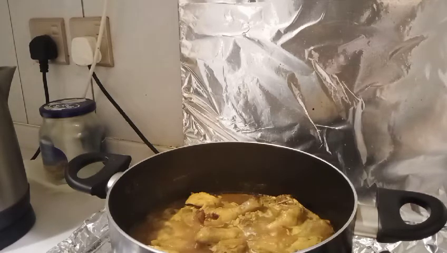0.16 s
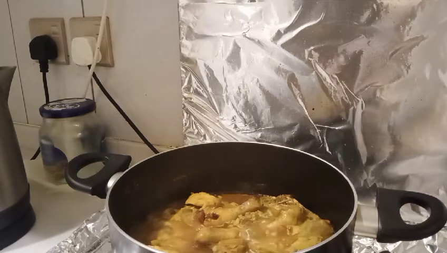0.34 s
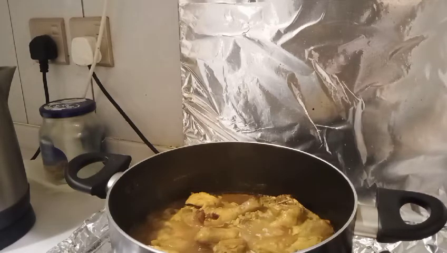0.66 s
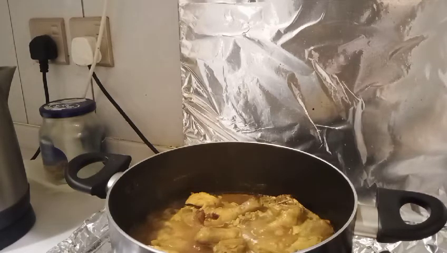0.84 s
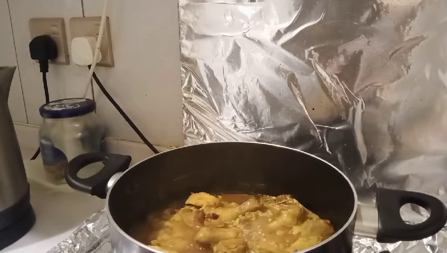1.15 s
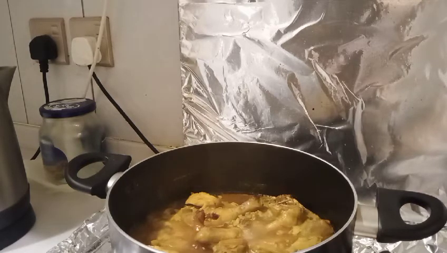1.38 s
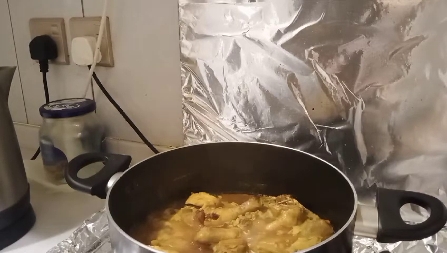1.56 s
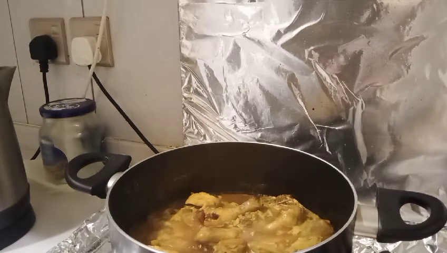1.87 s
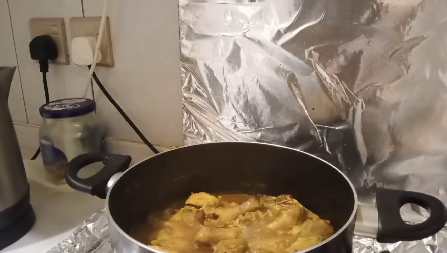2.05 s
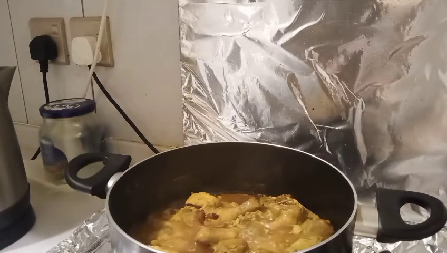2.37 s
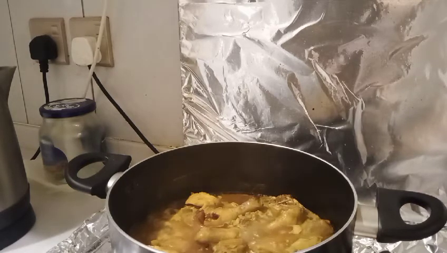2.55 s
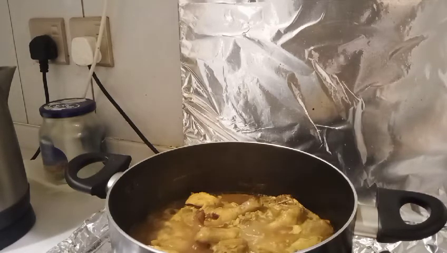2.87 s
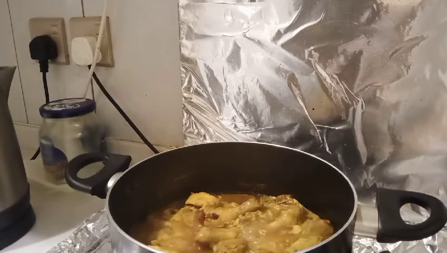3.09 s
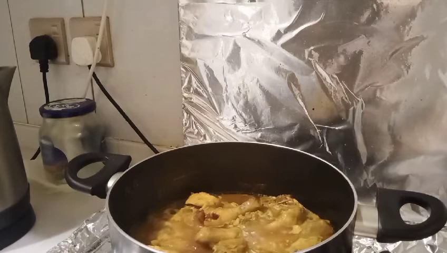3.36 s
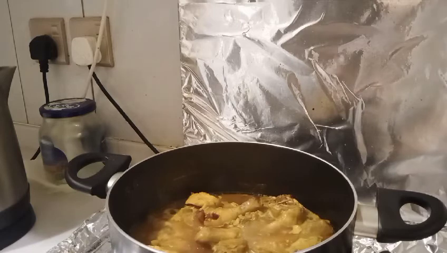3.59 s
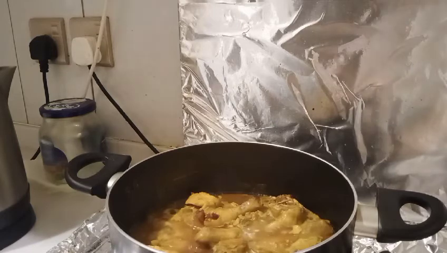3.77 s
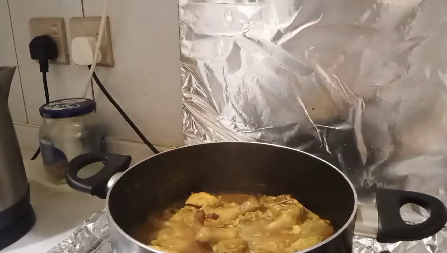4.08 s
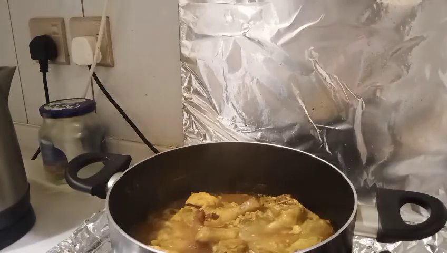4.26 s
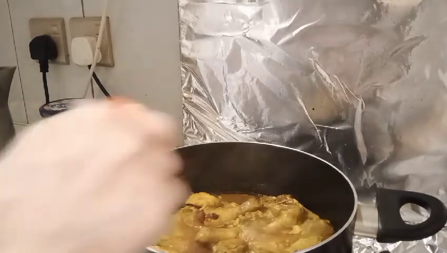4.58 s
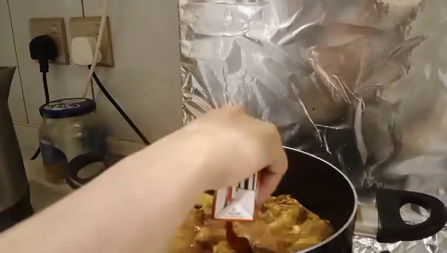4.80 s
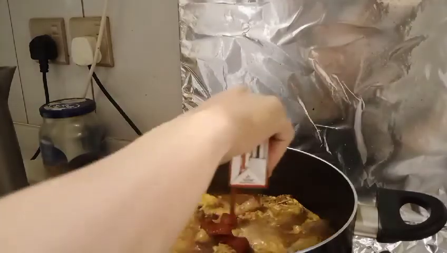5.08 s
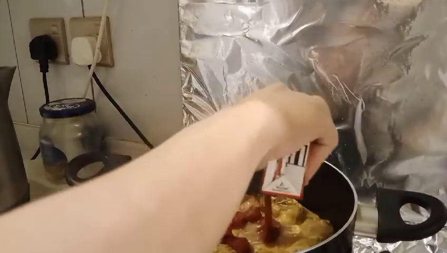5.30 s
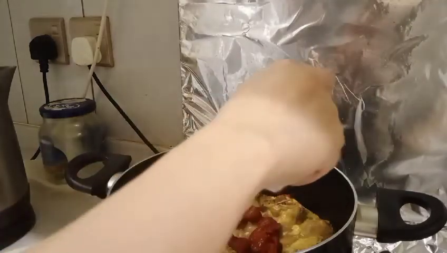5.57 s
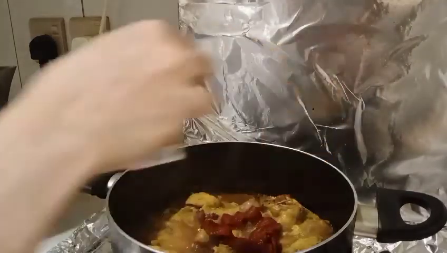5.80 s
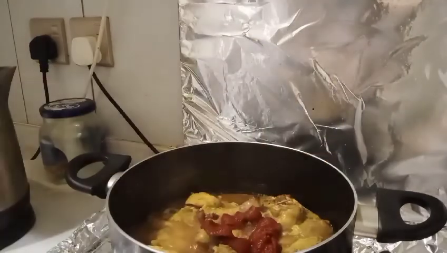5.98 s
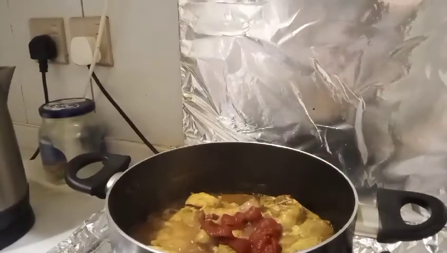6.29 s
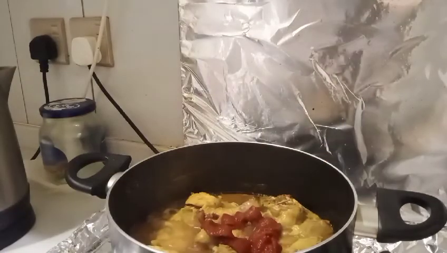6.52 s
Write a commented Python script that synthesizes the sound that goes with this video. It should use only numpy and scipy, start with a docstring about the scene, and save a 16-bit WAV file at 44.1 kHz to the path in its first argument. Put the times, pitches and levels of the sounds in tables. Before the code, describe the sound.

A close, small kitchen: stew blips and sputters above a quiet gas flame, calms, then a carton lands sharply on the worktop.

```python
"""A thick stew simmers in a pan in a small kitchen: tiny bubbles ping over the steady rush of the burner.
From the start to about 4.6 s, some three big bubbles a second heave the stew, puff steam and gurgle.
Until about 4.1 s blisters also pop: filtered noise with a ringing cavity. The stew slumps at 2.7 and 4.2 s.
Around 5 s a carton's spout splutters, and the stew slumps under the falling paste.
At 6.3 s the carton lands with a knock of decaying tones and a crack of noise, then bumps softly."""
import sys
import numpy as np
from scipy import signal
from scipy.fft import rfft, irfft, next_fast_len
from scipy.io import wavfile
from scipy.ndimage import uniform_filter1d, map_coordinates

SR = 44100
rng = np.random.default_rng(int(sys.argv[2]) if len(sys.argv) > 2 else 0)


def unload_wav(signal):
    """Save mono or channel-first audio to the path in sys.argv[1] as 16-bit WAV at rate SR, clipped to [-1, 1]."""
    wavfile.write(
        sys.argv[1],
        SR,
        np.round(np.clip(np.atleast_2d(signal).T, -1, 1) * 32767).astype(np.int16),
    )


N = 293265

# Big bubbles letting out steam; gurgles() and heaves() use them too. Levels are before pan and kitchen:
# (time of the steam's peak [s], steam level [dB], swell [s], treble tilt [dB per octave],
#  heave level [dB], gurgle pitch [Hz], gurgle level [dB])
BIG_BUBBLES = [(.13, -52.5, 0.073, 1, -65.5, 1660, -77), (0.519, -72, .06, 22, -80, 1230, -78),
               (.757, -49, 0.041, 0.5, -60.5, 1440, -75), (1.184, -56.5, .045, 1.5, -85, 1450, -88),
               (1.605, -45.5, 0.035, 0, -68, 1540, -61.5), (2.019, -55, 0.062, 5.5, -68, 1290, -85),
               (2.47, -47.5, 0.071, 5, -86, 1480, -54.5), (2.799, -66.5, 0.077, 3.5, -75, 3830, -71.5),
               (3.201, -52, .07, 8.5, -69.5, 1490, -87), (3.615, -51.5, .048, 2, -62.5, 1390, -74),
               (3.796, -63.5, 0.034, 4, -80, 1730, -72), (4.1, -58, 0.034, 10, -76, 1110, -51.5),
               (4.375, -67, 0.052, 7, -72, 2100, -81), (4.585, -56.5, 0.058, 4, -73, 1300, -60.5)]
# The carton's spout spluttering as it is squeezed: (time of the peak [s], level before pan and kitchen [dB])
SPOUT_SPLUTTERS = [(4.82, -64.5), (5.02, -70), (5.341, -69)]
FADE_S, FADE_SHARE = 0.038, 0.32  # a puff fades over this time plus a share of its swell
# The vent reopens once: delay, level against the puff, half length
AFTER_S, AFTER_DB, AFTER_LENGTH_S = 0.1, -14, 0.028
SPLUTTER_S, SPLUTTER_TILT_DB = 0.015, 22  # half length, treble tilt per octave


def puffs():
    """Steam sputters through wet vents, swelling and fading with each bubble; the carton's spout does too."""
    out = np.zeros(N)
    t = np.arange(-SR // 4, SR // 4) / SR
    for s, db, rise, tilt_db, *_ in BIG_BUBBLES:
        fall = FADE_S + FADE_SHARE * rise
        puff = swell(t, rise, fall) * hiss(len(t), tilt_db)
        add(out, s + t[0], amp(db) * puff)
        after_puff = swell(t, AFTER_LENGTH_S, AFTER_LENGTH_S) * hiss(len(t), tilt_db)
        add(out, s + AFTER_S + t[0], amp(db + AFTER_DB) * after_puff)
    for s, db in SPOUT_SPLUTTERS:
        splutter = swell(t, SPLUTTER_S, SPLUTTER_S) * hiss(len(t), SPLUTTER_TILT_DB)
        add(out, s + t[0], amp(db) * splutter)
    sputter = churn(out, patchy_db=3)
    return kitchen(pan(sputter, level_db=-0.5), wet_db=-13.5)


# The stew slumping after the widest bursts and under the falling paste; heaves() uses them too:
# (time of the peak [s], rumble pitch [Hz], rumble level [dB], rumble half length [s],
#  gurgle pitch [Hz], gurgle level [dB])
STEW_SLUMPS = [(2.675, 128, -60.5, .055, 3230, -52.5), (4.16, 103.5, -53, 0.075, 440, -55),
               (5.021, 122, -65, 0.046, 320, -82)]
GURGLE_LAG_S, GURGLE_S = 0.02, 0.027  # lag on the steam, half length of the fall
AFTER_GURGLE_DB, AFTER_PITCH = -20, 1.103  # level against the puff; the shrunken pocket rings higher


def gurgles():
    """After each puff, as its vent reopens, and in each slump, steam blown across a pocket sounds hollow."""
    out = np.zeros(N)
    t = np.arange(-SR // 4, SR // 4) / SR
    pockets = [(s, hz, db, GURGLE_S) for s, *_, hz, db in STEW_SLUMPS]
    for s, steam_db, *_, hz, db in BIG_BUBBLES:
        pockets.append((s + GURGLE_LAG_S, hz, db, GURGLE_S))
        pockets.append((s + AFTER_S, AFTER_PITCH * hz, steam_db + AFTER_GURGLE_DB, AFTER_LENGTH_S))
    for s, pitch_hz, db, length in pockets:
        note = turbulence(len(t), lambda hz: resonance(hz, pitch_hz, 0.22 * pitch_hz) ** 2)
        add(out, s + t[0], amp(db) * swell(t, 1.5 * length, length) * note)
    return out


# The lift: pitch, lead on the steam (share of the swell), half length
HEAVE_HZ, HEAVE_LEAD, HEAVE_S = 125, 0.6, 0.04


def heaves():
    """Each big bubble lifts the stew just before its steam peaks; lifts and slumps make a dull rumble."""
    out = np.zeros(N)
    t = np.arange(-SR // 4, SR // 4) / SR
    lifts = [(s - HEAVE_LEAD * rise, HEAVE_HZ, db, HEAVE_S) for s, _, rise, _, db, *_ in BIG_BUBBLES]
    for s, pitch_hz, db, length, *_ in lifts + STEW_SLUMPS:
        rumble = turbulence(len(t), lambda hz: resonance(hz, pitch_hz, 0.8 * pitch_hz) ** 2)
        add(out, s + t[0], amp(db) * swell(t, length, length) * rumble)
    return out


# Blisters bursting; levels are before the trim, pan and kitchen, the cavity's is against the spray:
# (time [s], level [dB], cavity pitch [Hz], cavity level [dB],
#  spray low edge [Hz], spray high edge [Hz], time constant of the opening [s])
BLISTERS = [(0.043, -60, 3240, 2, 915, 4000, 0.031), (0.0817, -46, 890, -1.5, 130, 1340, .0012),
            (.238, -54, 890, -1, 570, 1150, .008), (1.082, -34, 310, -20.5, 760, 4950, 0.0075),
            (1.553, -52, 520, -11, 1120, 4500, .0085), (1.939, -53.5, 750, 2, 676, 1700, .012),
            (1.968, -54.5, 843, 0.5, 690, 1370, 0.006), (2.088, -59, 1310, -1, 1000, 2970, 0.0045),
            (2.495, -38, 3700, 0, 3000, 9000, .002), (2.4994, -19.5, 3735, -6, 2200, 11000, .0008),
            (2.578, -30.3, 695, -7.5, 1010, 3400, .0025), (3.087, -42, 310, -15, 1370, 5130, 0.018),
            (3.563, -56, 700, -12, 1000, 4480, 0.011), (4.01, -45.5, 4140, -3, 3000, 4750, .011),
            (4.0769, -30.5, 2183, -1.5, 710, 4000, .001)]
# The mouth's note against the cavity's; smaller cavities sound it less
MOUTH_HZ, MOUTH_DB, MOUTH_DB_PER_OCTAVE = 1220, -5.5, -6.5
# Spray reaching up to this high edge takes longest to fall 60 dB;
# fine mist and thick plops die sooner, by this power
POP_T60_S, POP_REF_HZ, POP_DAMPING = 0.28, 3900, 0.45
# The first jet lasts this long, ends about this fast, and the level drops by this much
SPRAY_S, SPRAY_END_S, SPRAY_DROP_DB = 0.037, 0.003, 3


def pops():
    """A blister tears open: a spit of spray rattles round the pan while its cavity and mouth ring."""
    out = np.zeros(N)
    t = np.arange(SR // 2) / SR
    jet = amp(-SPRAY_DROP_DB * (1 + np.tanh((t - SPRAY_S) / SPRAY_END_S)) / 2)
    for s, db, cavity_hz, cavity_db, low_hz, high_hz, opening in BLISTERS:
        def band(hz):
            low_edge = 0.016 + 1 / np.sqrt(1 + (low_hz / (hz + 1)) ** 8)
            return low_edge / np.sqrt(1 + (hz / high_hz) ** 5)

        spit = turbulence(len(t), band, grain_db=2.0)
        octaves_above = np.log2(max(cavity_hz / MOUTH_HZ, 1))
        mouth_db = cavity_db + MOUTH_DB + MOUTH_DB_PER_OCTAVE * octaves_above
        for note_hz, note_db in ((cavity_hz, cavity_db), (MOUTH_HZ, mouth_db)):
            width_hz = 160 + 0.021 * note_hz
            note = turbulence(len(t), lambda hz: resonance(hz, note_hz, width_hz) ** 2)
            spit = spit + amp(note_db) * note
        t60 = POP_T60_S * min(POP_REF_HZ / high_hz, high_hz / POP_REF_HZ) ** POP_DAMPING
        burst = (1 - np.exp(-t / opening)) * amp(-60 * t / t60)
        envelope = jet * spurts(len(t)) * burst / burst.max()
        add(out, s, kitchen(amp(db - 1.5) * envelope * spit, wet_db=-11.0))
    return pan(out, level_db=-2.0)


# The carton landing and settling, before the trim and kitchen:
# (time [s], level [dB], crack level against it [dB], softness of the contact [s])
CARTON_KNOCKS = [(6.3397, -11.5, -12.5, 0.0013), (6.585, -45, -33, 0.0055)]
# Ringing tones of carton and worktop: (pitch [Hz], level [dB], time to fall 60 dB [s])
WORKTOP_TONES = [(129.3, -19.5, 0.21), (145, -18.5, 0.1), (256, -11, 0.04), (283, -22.5, 0.07),
                 (420, -10, 0.053), (561, -12.5, 0.1), (642, -18.5, 0.12), (808, 1, 0.016),
                 (881, -4, 0.043), (1089, 10, 0.012), (1173, -4, 0.032), (1420, -1.5, 0.019)]
# Colour of the crack: (frequency [Hz], relative level [dB])
CRACK_COLOUR = [(100, 21), (1400, -22), (2000, 2), (2700, 4.5), (4300, 5), (6000, -3.5), (16000, -12)]


def carton():
    """The carton hits the worktop: a brief crack and a hollow ringing knock, then a soft settling bump."""
    out = np.zeros(N)
    t = np.arange(SR // 2) / SR
    ring = sum(amp(level - 60 * t / t60) * np.sin(2 * np.pi * hz * t) for hz, level, t60 in WORKTOP_TONES)
    for s, db, crack_db, softness in CARTON_KNOCKS:
        crack_noise = turbulence(len(t), lambda hz: amp(along(CRACK_COLOUR, hz)))
        crack = amp(crack_db - 60 * t / 0.03) * crack_noise
        contact = amp(db) * (1 - np.exp(-(t / softness) ** 2))
        add(out, s, kitchen(0.73 * contact * ring, wet_db=-7.0) + kitchen(contact * crack, wet_db=-8.5))
    # the knock keeps almost no deep bass below about 90 Hz
    return signal.sosfilt(signal.butter(4, 92, "highpass", fs=SR, output="sos"), out)


def simmer(count=70, level_db=-78, pitch_hz=2300, cycles=40):
    """Tiny bubbles burst all the time, each a short, slightly rising ping."""
    out = np.zeros(N)
    t = np.arange(SR // 10) / SR
    times = rng.uniform(0, N / SR, count)
    for when, (pitch, size) in zip(times, rng.standard_normal((count, 2))):
        hz = min(pitch_hz * np.exp(0.6 * pitch), SR / 4)
        age = t * hz / cycles  # at age 1 the ping is 30 dB down
        tone = np.sin(2 * np.pi * hz * t * (1 + 0.027 * np.minimum(age, 1)))
        ping = tone * amp(-30 * age) * (1 - np.exp(-20 * age))
        add(out, when, amp(level_db + 3.7 * min(size, 1)) * ping)
    return kitchen(out, wet_db=6)


# Colour of the burner's rush: (frequency [Hz], relative level [dB])
FLAME_COLOUR = [(25, -21), (60, -13), (78, -11.5), (120, 2.5), (160, -6), (300, -5), (600, -13),
                (1250, -12.5), (1600, -18), (2300, -20.5), (2800, -22.5), (6300, -30.5), (10000, -27.5),
                (15500, -32.5)]
# Narrow resonances singing in the hiss:
# (pitch [Hz], width before widening [Hz], level [dB], depth of the flaring [dB])
FLAME_WHISTLES = [(2042, 270, -77, 3), (2383, 93, -77.5, 3), (3220, 55, -82.5, 3), (4250, 76, -91.5, 6),
                  (5280, 90, -83.5, 4), (5530, 110, -93.5, 4.5), (7240, 74, -91.5, 9.5),
                  (7770, 200, -78.5, 1)]


def burner():
    """The flame rumbles and hisses as coloured noise; thin whistles flare and fade in it."""
    rush_gain = amp(-68.0 + 0.53 * wobble(4.3, N))
    rush = rush_gain * turbulence(N, lambda hz: amp(along(FLAME_COLOUR, hz)))
    for centre_hz, width_hz, db, flare_db in FLAME_WHISTLES:
        whistle = turbulence(N, lambda hz: resonance(hz, centre_hz, 1.19 * width_hz) ** 2)
        rush = rush + amp(db) * unit(amp(flare_db * wobble(21, N)) * whistle)
    return rush


# Colour of escaping steam: (frequency [Hz], relative level [dB])
STEAM_COLOUR = [(100, -15), (500, -26.5), (1000, -31), (2100, -7), (2900, 3.5), (4000, 4), (5200, 0),
                (7000, 1), (16000, -7.5)]


def hiss(n, tilt_db):
    """Gas forced through a wet opening; a narrower one tilts it towards the treble."""
    def colour(hz):
        octaves = np.clip(np.log2((hz + 1) / 4500), -1, 1)
        return amp(along(STEAM_COLOUR, hz) + tilt_db * octaves)

    return spurts(n) * turbulence(n, colour, grain_db=2.0)


SPUTTER_DB, SPUTTER_RATE = 1.5, 57.1  # depth, random curve points a second


def spurts(n):
    """The uneven gain of spray and steam flowing through thick sauce."""
    return amp(SPUTTER_DB * wobble(SPUTTER_RATE, n))


def churn(x, patchy_db):
    """The wet openings keep changing shape, so patches of the spectrum come and go."""
    z = signal.stft(x, nperseg=1024)[2]
    field = uniform_filter1d(rng.standard_normal(z.shape), size=5, axis=0)
    field = uniform_filter1d(field, size=4, axis=1)
    gain = amp(patchy_db * unit(field))
    return signal.istft(z * unit(gain), nperseg=1024)[1][:len(x)]


# Resonances of the pan's air and metal: (pitch [Hz], width [Hz], level against the direct sound [dB])
PAN_RESONANCES = [(817, 44, -8), (1310, 110, -5.5), (1723, 97, -4.5), (2000, 27, -8), (2615, 40, -4),
                  (3200, 41, -1.5), (3650, 18, 2.5), (3910, 54, 3), (4427, 88, 0), (5550, 160, -1.5),
                  (6660, 110, -4), (6720, 18.6, 3.5), (6910, 18, 7), (7390, 11, 11)]


def pan(x, level_db):
    """The direct sound plus the ringing of the pan around it."""
    def ring(hz):
        return sum(amp(db) * resonance(hz, centre, width) for centre, width, db in PAN_RESONANCES)

    return filtered(x, lambda hz: amp(level_db) * (1 + ring(hz)))


# Echo of the close walls: (frequency [Hz], time to fall 60 dB [s])
KITCHEN_DECAY = [(100, 0.46), (300, 0.27), (1000, 0.23), (4000, 0.24), (8000, 0.15), (15000, 0.12)]


def kitchen(x, wet_db):
    """x with the answer of the close walls; each frequency dies at its own speed."""
    hz, t, z = signal.stft(rng.standard_normal(SR // 2), SR, nperseg=256)
    decay = amp(-60 * t / along(KITCHEN_DECAY, hz)[:, None])
    tail = signal.istft(z * decay, SR, nperseg=256)[1]
    tail = np.pad(tail / np.linalg.norm(tail), (SR // 250, 0))  # the walls answer 4 ms late
    return x + amp(wet_db) * signal.fftconvolve(x, tail)[:len(x)]


def amp(db):
    """Decibels as a plain gain."""
    return 10 ** (np.asarray(db) / 20)


def unit(x):
    """x at rms 1."""
    return x / np.sqrt(np.mean(x ** 2) + 1e-20)


def along(points, hz):
    """Read (frequency [Hz], value) points at any frequency, on a log axis."""
    f, v = np.transpose(points)
    return np.interp(np.log(hz + 1), np.log(f + 1), v)


def filtered(x, response):
    """x times a response of frequency."""
    m = next_fast_len(len(x) + SR // 4)
    return irfft(rfft(x, m) * response(np.fft.rfftfreq(m, 1 / SR)), m)[:len(x)]


def resonance(hz, centre_hz, width_hz):
    """Complex response of one damped resonator."""
    return 1j * hz * width_hz / (centre_hz ** 2 - hz ** 2 + 1j * hz * width_hz)


def wobble(rate, n):
    """A smooth random curve of n samples through `rate` random points a second."""
    points = rng.standard_normal(int(n * rate / SR) + 4)
    return map_coordinates(points, [np.arange(n) * rate / SR])


def turbulence(n, response, grain_db=0):
    """Coloured noise of rms 1; droplets can break it into grains under a millisecond long."""
    flow = rng.standard_normal(n)
    if grain_db:
        flow = flow * amp(grain_db * wobble(1500, n))
    return unit(filtered(flow, response))


def swell(t, rise, fall, roundness=2.12):
    """A rounded hump at t = 0 whose skirts steepen as they fall."""
    u = t / np.where(t < 0, rise, fall)
    return np.exp(-0.85 * np.abs(u) ** roundness)


def add(track, s, sound):
    """Mix a sound into the track from time s, cutting what sticks out at either end."""
    start = round(s * SR)
    part = sound[max(-start, 0):len(track) - start]
    track[max(start, 0):][:len(part)] += part


def scene():
    """All the sources mixed into one channel."""
    stew = puffs() + gurgles() + heaves() + pops() + simmer()
    return (stew + carton() + burner())[None]


# Colour of the microphone: (frequency [Hz], level [dB])
MIC_COLOUR = [(6800, -1), (7900, -3), (9200, -18), (11500, -16.5), (13000, -5), (15500, -6)]
TOP_HZ = 15800  # band limit


def record(dry):
    """The microphone has a hollow around 10 kHz and keeps nothing above its band limit."""
    return filtered(dry[0], lambda hz: amp(along(MIC_COLOUR, hz)) * (hz < TOP_HZ))[None]


dry = scene()
out = record(dry)
unload_wav(out)
```